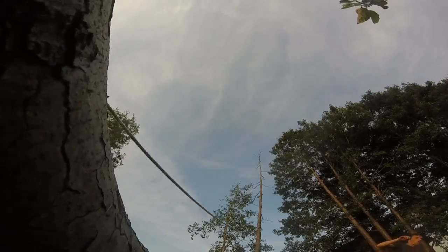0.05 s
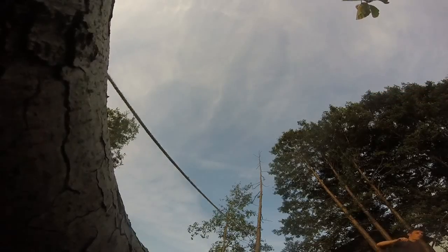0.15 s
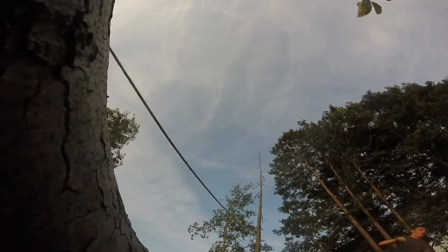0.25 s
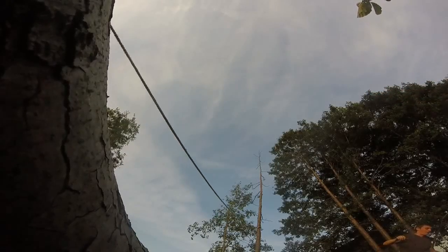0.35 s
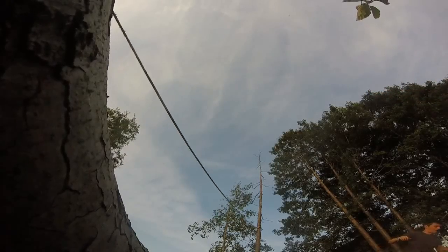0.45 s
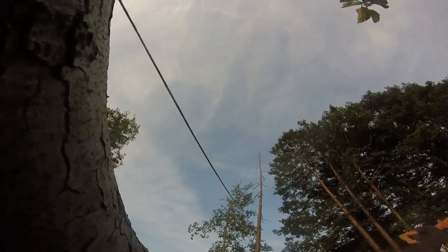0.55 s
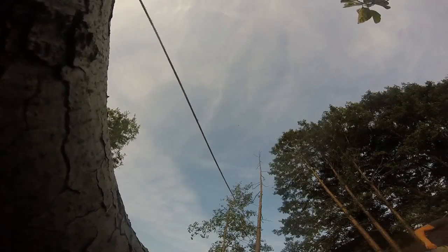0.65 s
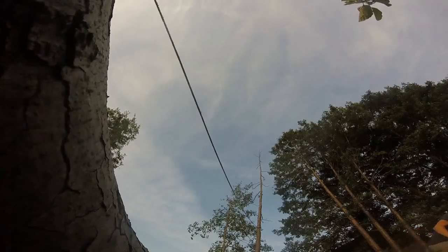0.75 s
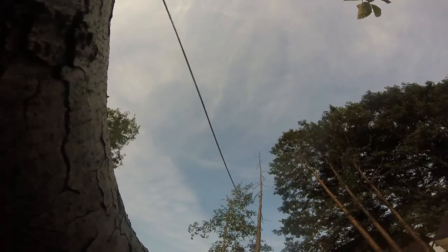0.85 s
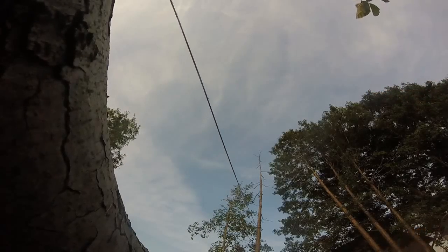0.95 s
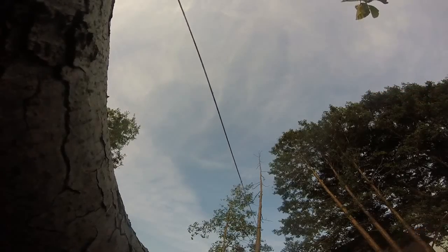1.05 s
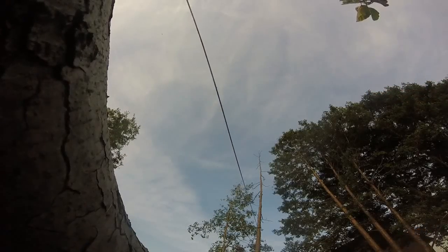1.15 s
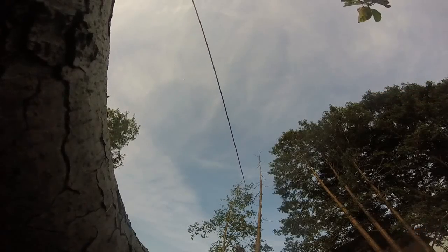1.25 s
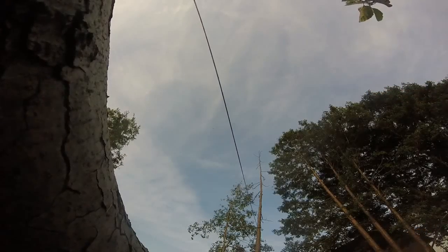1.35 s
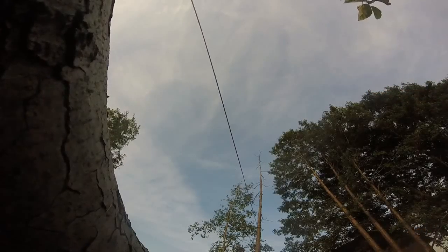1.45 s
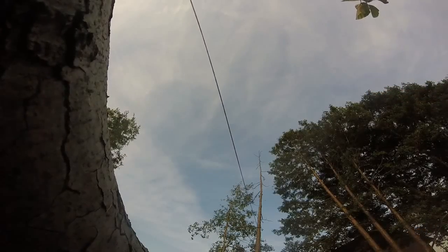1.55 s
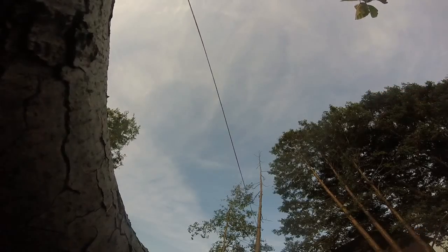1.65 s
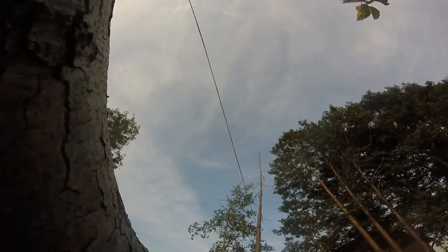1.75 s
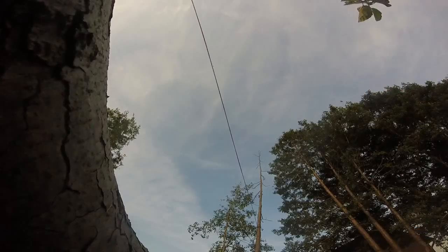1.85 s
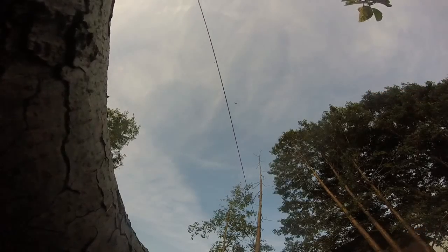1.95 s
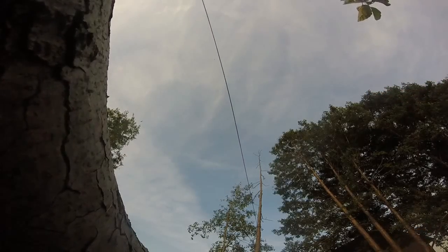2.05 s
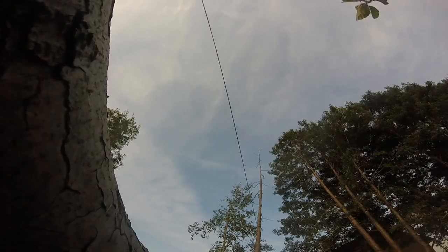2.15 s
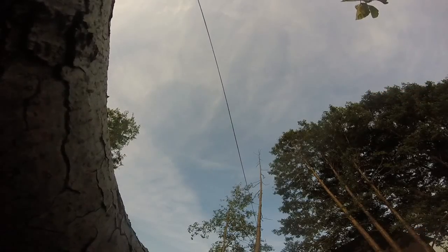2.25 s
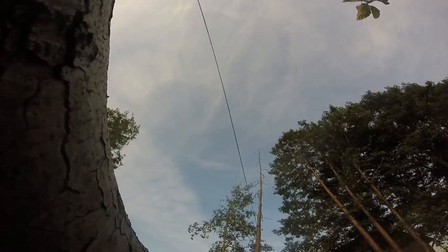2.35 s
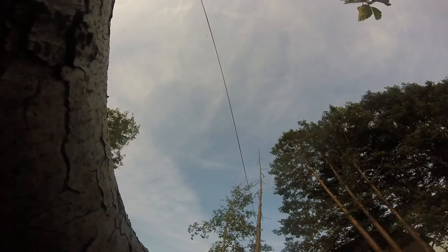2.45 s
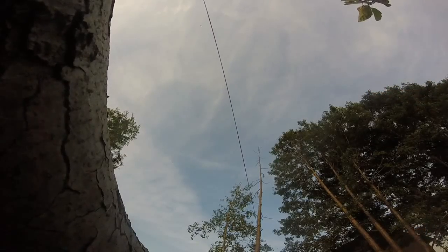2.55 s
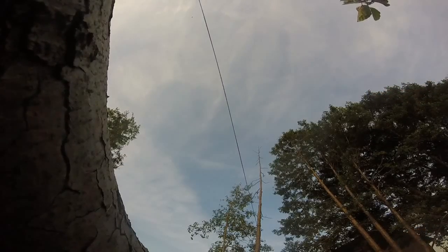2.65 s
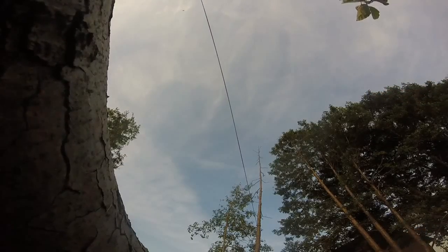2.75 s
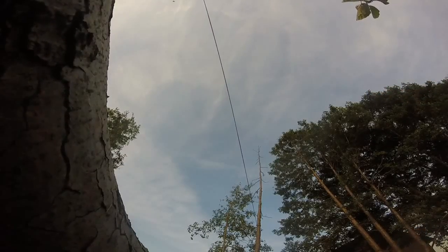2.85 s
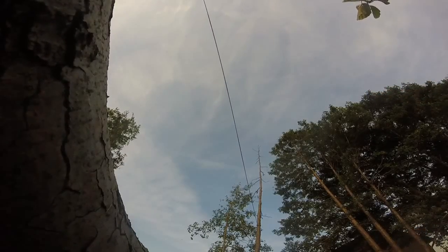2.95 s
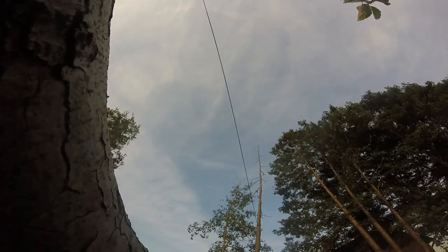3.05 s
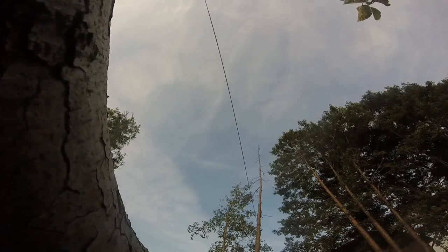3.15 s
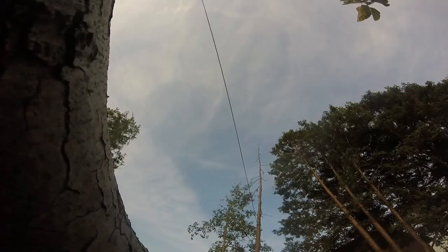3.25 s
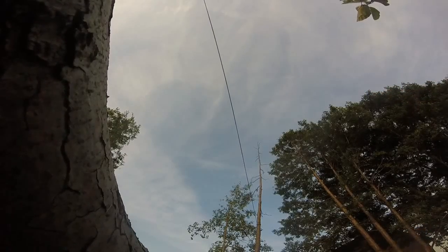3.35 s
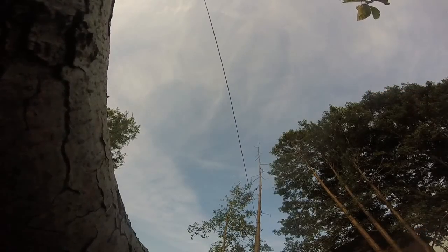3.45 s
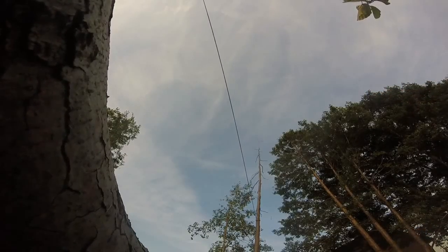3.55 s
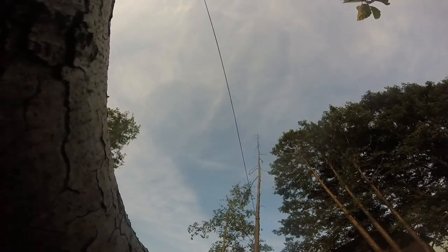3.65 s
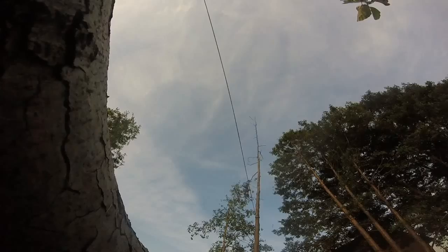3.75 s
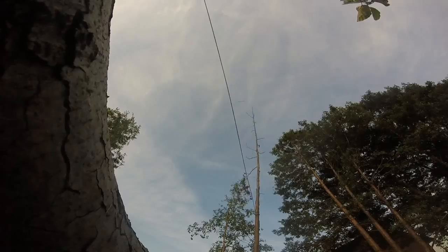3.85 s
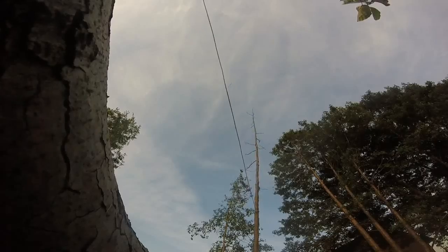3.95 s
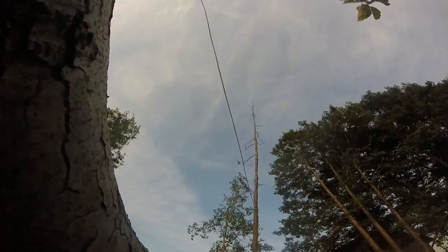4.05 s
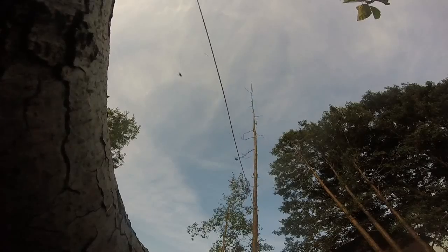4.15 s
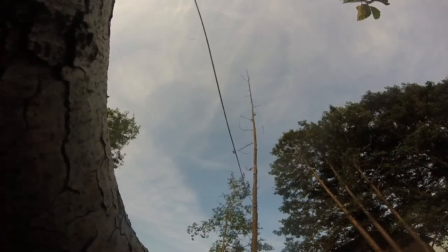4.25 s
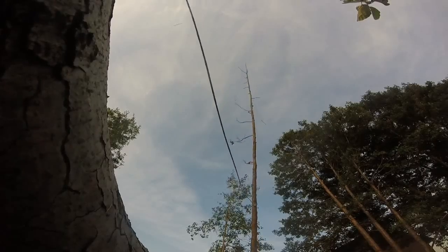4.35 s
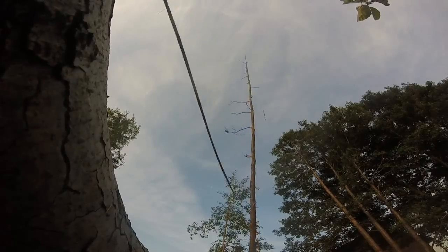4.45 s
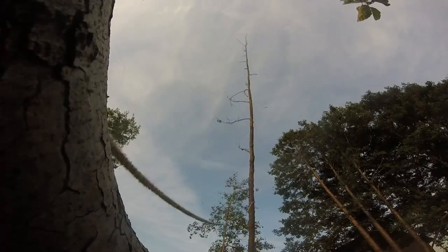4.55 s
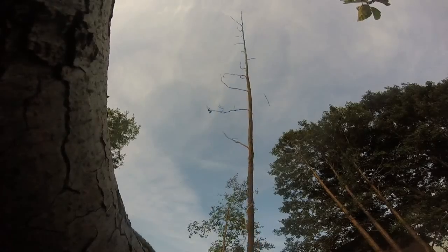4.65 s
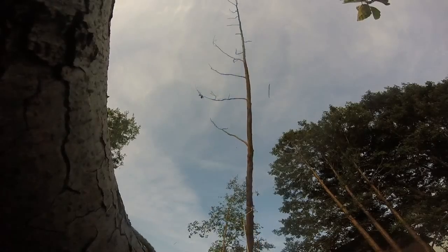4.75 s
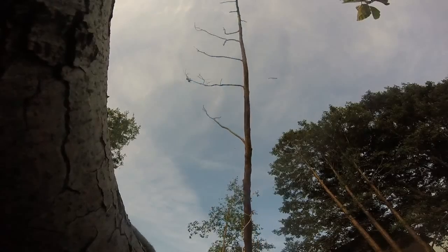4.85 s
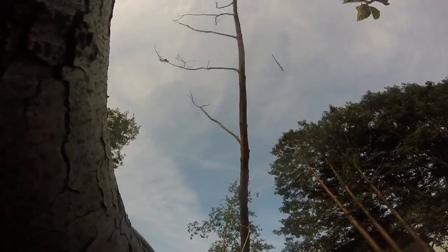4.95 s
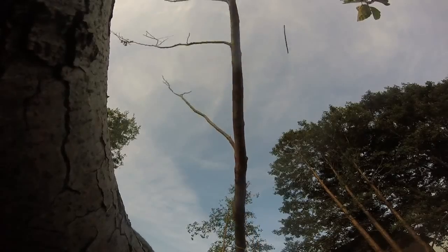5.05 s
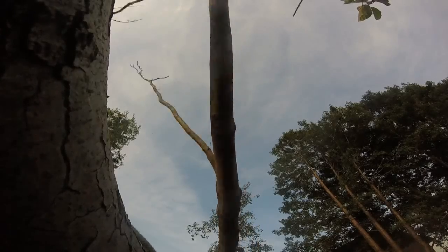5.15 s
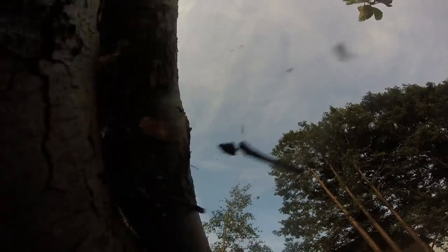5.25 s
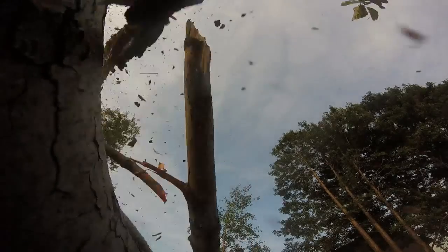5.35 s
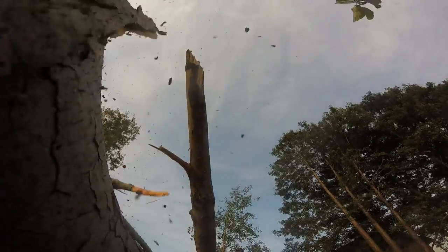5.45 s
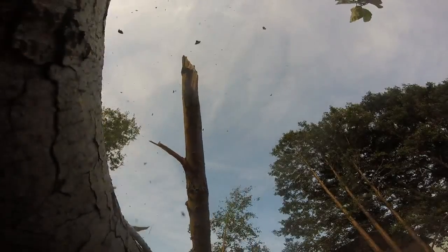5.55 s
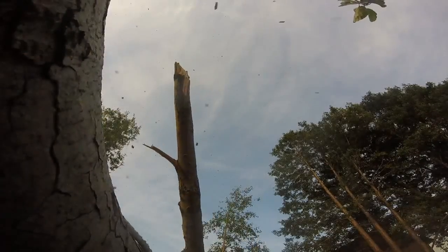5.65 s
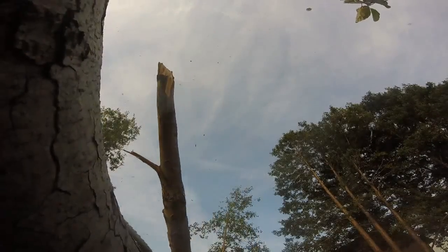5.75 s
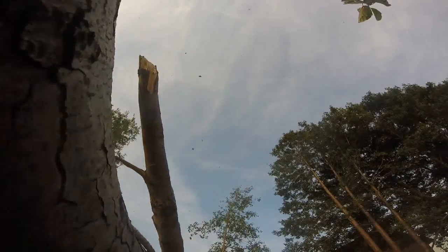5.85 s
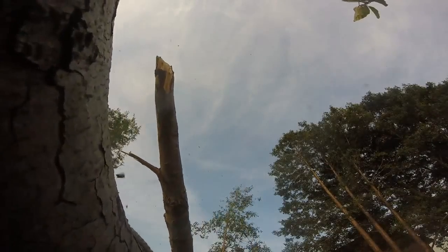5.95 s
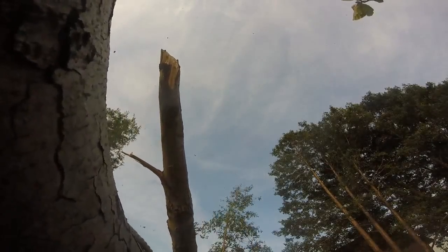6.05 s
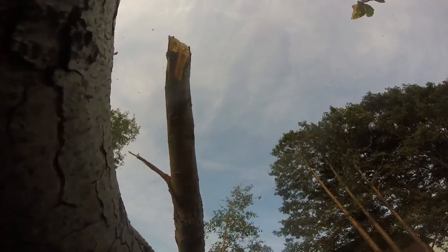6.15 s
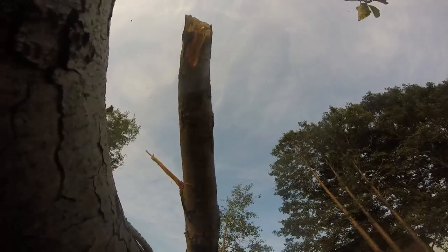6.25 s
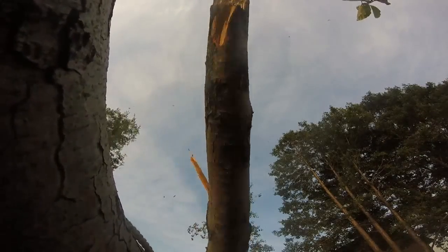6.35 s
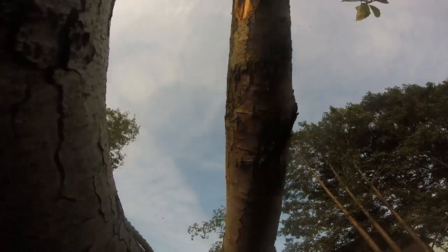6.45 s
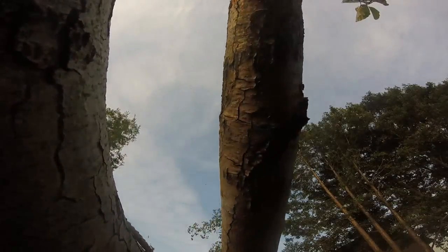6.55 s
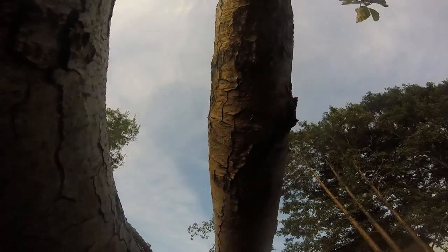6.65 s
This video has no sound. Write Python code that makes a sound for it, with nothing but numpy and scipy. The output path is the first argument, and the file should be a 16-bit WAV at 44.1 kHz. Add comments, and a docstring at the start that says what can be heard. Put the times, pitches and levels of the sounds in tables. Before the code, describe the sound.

A quiet wood, with soft, bass-weighted air noise. Two thin, distant bird whistles glide downward at about 1.0 and 1.3 s, with small twig ticks around 1.2, 1.6 and 2.3 s. A faint ground rumble stirs near 3 s. At 3.45-3.5 s the dead trunk cracks sharply at its foot, a hollow mid-pitched woody snap with a low thump, splinter spray and forest echo. Weaker creaking cracks continue to 4.2 s, with two more at 4.6 s; a very faint whistle comes at 4.8 s. Dry branches crackle at 5.0 s. At 5.29 s the trunk smashes down beside the microphone: deep thud, overloaded splintering crack, crushing wood and a second break at 5.35 s. Chips clatter until 5.65 s. The broken log thuds at 5.77 and 6.0 s, then in small quick knocks to 6.2 s, over fading rumble, trickling bark and last faint snaps at 6.3 and 6.5 s.

```python
"""Dead tree pulled down in a wood.

Bird: three far, gliding sine whistles. Trunk: cracks at its foot as a rope pulls it over, creaks, then
smashes down near the microphone and breaks; each crack is a snap plus fibre clicks through a wood filter.
Debris: random clicks of bark, twigs and chips. Ground: shaped noise rumble and sagging sine thuds as the
broken log bounces to rest. Air noise and forest echoes lie behind; the recorder's gain control ducks and recovers.
"""
import sys
import numpy as np
from scipy import signal
from scipy.fft import rfft, irfft
from scipy.io import wavfile
from scipy.ndimage import uniform_filter1d, minimum_filter1d

SR = 44100
rng = np.random.default_rng(int(sys.argv[2]) if len(sys.argv) > 2 else 0)


def generate_wav(sig):
    """Save sig (samples, or channels by samples) to the path in sys.argv[1] as 16-bit PCM at SR."""
    pcm = np.round(np.clip(np.atleast_2d(sig).T, -1, 1) * 32767).astype(np.int16)
    wavfile.write(sys.argv[1], SR, pcm)


N = 295848
TIME = np.arange(N) / SR


def from_db(db):
    """Decibels to amplitude gain."""
    return 10 ** (np.asarray(db) / 20)


def rms_one(x):
    """Scale to unit power."""
    return x / np.sqrt(np.mean(x ** 2) + 1e-20)


def at_hz(points, hz):
    """Interpolate a table on a log-frequency axis."""
    table_hz, value = np.transpose(points)
    return np.interp(np.log(hz + 1e-3), np.log(table_hz), value)


def band(x, low_hz, high_hz):
    """Causal band-pass."""
    sos = signal.butter(3, [low_hz, high_hz], "band", fs=SR, output="sos")
    return signal.sosfilt(sos, x + 1e-18)


def colour(x, spectrum, size=8192):
    """Minimum-phase filter from a spectrum table: the body rings only after it is struck."""
    gain = from_db(at_hz(spectrum, np.fft.rfftfreq(size, 1 / SR)))
    cepstrum = irfft(np.log(gain))
    # fold the cepstrum to its causal half
    cepstrum[1:size // 2] *= 2
    cepstrum[size // 2 + 1:] = 0
    impulse_response = irfft(np.exp(rfft(cepstrum)))
    return signal.fftconvolve(x, impulse_response)[:len(x)]


def add(track, s, sound):
    """Mix a sound in at s seconds."""
    start = round(s * SR)
    track[start:start + len(sound)] += sound[:N - start]


def grains(count, per_s, spread_db):
    """Random clicks of uneven size and either sign over count samples."""
    sizes = from_db(spread_db * np.minimum(rng.exponential(1, count), 4))
    signs = rng.choice([-1, 1], count)
    return sizes * signs * (rng.random(count) < per_s / SR)


def spell(row, attack_s, release_db_per_s):
    """Envelope that rises, sags while it lasts, then dies away."""
    s, length_s, level_db, sag_db_per_s = row
    t = np.maximum(TIME - s, 0)
    release_db = release_db_per_s * np.maximum(t - length_s, 0)
    return np.minimum(t / attack_s, 1) * from_db(level_db - sag_db_per_s * t - release_db)


# Edges in Hz of the knock, wood and splinter bands.
BAND_EDGES_HZ = [150, 1100, 3600, 17000]


def cracks(table, body, fibres_per_s, spread_db, snap_db, rise_s, variety_db=2.5, thin_db=9.0, size=6000):
    """Each crack is one snap and a short avalanche of fibre breaks ringing through its own piece of wood."""
    out, t = np.zeros(N), TIME[:size]
    hz = np.geomspace(200, 16000, 44)
    octaves_into_splinters = np.clip(np.log2(hz / BAND_EDGES_HZ[2]), 0, 1)
    for s, *levels_db, t60_s in table:
        envelope = (1 - np.exp(-t / rise_s)) * from_db(-60 * t / t60_s)
        fibres = rms_one(grains(size, fibres_per_s, spread_db)) * envelope
        fibres[0] += from_db(snap_db)

        # where splinters outweigh the wood's ring the piece is thin and its treble rises
        knock_db, wood_db, splinter_db = levels_db
        treble_db = np.clip(splinter_db - wood_db, 0, thin_db) * octaves_into_splinters
        piece_variety_db = variety_db * rng.standard_normal(len(hz))
        piece = np.c_[hz, at_hz(body, hz) + treble_db + piece_variety_db]
        burst = colour(fibres, piece)

        for level_db, low_hz, high_hz in zip(levels_db, BAND_EDGES_HZ, BAND_EDGES_HZ[1:]):
            part = band(burst, low_hz, high_hz)
            loudest_rms = np.sqrt(uniform_filter1d(part ** 2, size=176).max())  # over 4 ms
            add(out, s, from_db(level_db) * part / loudest_rms)
    return out


def light_cracks(table):
    """Widen rows for chips and twigs, which click with hardly any knock."""
    knock_db = -25.5  # against the wood's ring
    return [(s, wood_db + knock_db, wood_db, splinter_db, t60_s) for s, wood_db, splinter_db, t60_s in table]


# Air noise spectrum. Each row: frequency in Hz, relative level in dB.
AIR_SPECTRUM = [(12, -37.5), (20, -9), (59, -0.5), (103, 0), (137, -6), (175, -6), (1580, -19.5),
                (2330, -20.5), (2610, -22.5), (3260, -23.5), (13900, -40.5), (15500, -50)]
AIR_DB = -56.5


def air():
    """Steady noise, strongest in the bass."""
    return from_db(AIR_DB) * rms_one(colour(rng.standard_normal(N), AIR_SPECTRUM))


# Scatter from the surrounding trees. Each row: frequency in Hz, t60 in s.
FOREST_DECAY = [(200, 1), (1500, 0.46), (14000, 0.62)]


def forest(x, build_s):
    """Many faint echoes from trunks and leaves, each band dying at its own rate."""
    t, edges_hz = TIME[:SR], np.geomspace(120, 16000, 8)
    echoes = grains(SR, 4000, 0.62) * (1 - np.exp(-t / build_s))
    tail = np.zeros(SR)
    for low_hz, high_hz in zip(edges_hz, edges_hz[1:]):
        t60_s = at_hz(FOREST_DECAY, np.sqrt(low_hz * high_hz))
        tail += band(echoes, low_hz, high_hz) * from_db(-60 * t / t60_s)
    return signal.fftconvolve(x, tail / np.sqrt(np.sum(tail ** 2)))[:N]


# Whistles that glide down and may turn up again. Each row: start in seconds, length in s,
# first pitch in Hz, fall in Hz per s, turn after s, level in dB towards the end before flutter and fade.
BIRD_WHISTLES = [(1.044, 0.196, 2810, 1365, 0.16, -61), (1.335, 0.2, 2945, 3850, 0.122, -64),
                 (4.811, 0.11, 2755, 696, 0.11, -66)]
BIRD_RISE_HZ_PER_S, BIRD_SWELL_DB, BIRD_FADE_S = 4140, 9, 0.021


def bird(waver, flutter_db, overtone_db):
    """Thin gliding whistles that swell and flutter in pitch and strength."""
    out = np.zeros(N)
    flutter = rms_one(band(rng.standard_normal(N), 9, 100))
    for s, length_s, first_hz, fall_hz_per_s, turn_s, level_db in BIRD_WHISTLES:
        t = TIME[:round(length_s * SR)]
        wobble = flutter[round(s * SR):][:len(t)]
        fall_hz = fall_hz_per_s * np.minimum(t, turn_s)
        rise_hz = BIRD_RISE_HZ_PER_S * np.maximum(t - turn_s, 0)
        hz = (first_hz - fall_hz + rise_hz) * (1 + waver * wobble)
        phase = 2 * np.pi * np.cumsum(hz) / SR

        fade = np.minimum(np.minimum(t, t[::-1]) / BIRD_FADE_S, 1)
        swell_db = BIRD_SWELL_DB * (t / length_s - 1)
        envelope = np.sqrt(2) * fade * from_db(level_db + swell_db + flutter_db * wobble)
        add(out, s, envelope * (np.sin(phase) + from_db(overtone_db) * np.sin(2 * phase)))
    return out


# Ground shaking as the roots strain, the tree leans, crashes and rolls.
# Each row: start in seconds, length in s, level in dB, sag in dB per s.
RUMBLE_SPELLS = [(2.986, 0.095, -50.5, 2), (3.27, 0.35, -53.5, 8), (3.548, 1.4, -51.5, 1.5),
                 (5.294, 0.088, -16.5, 28.5), (5.54, 0.13, -39, 2), (5.784, 1.4, -35, 23.5)]
# Ground spectrum. Each row: frequency in Hz, relative level in dB.
GROUND_SPECTRUM = [(15, -17.5), (30, -2.5), (45, 6), (65, -1.5), (110, 1.5), (170, -16.5), (400, -30),
                   (2000, -71.5)]
RUMBLE_ATTACK_S, RUMBLE_RELEASE_DB_PER_S, RUMBLE_FLOOR_DB = 0.079, 177, -65


def rumble():
    """Low shaking of the ground over a faint steady rumble."""
    spells = sum(spell(row, RUMBLE_ATTACK_S, RUMBLE_RELEASE_DB_PER_S) for row in RUMBLE_SPELLS)
    level = from_db(RUMBLE_FLOOR_DB) + spells
    return level * rms_one(colour(rng.standard_normal(N), GROUND_SPECTRUM))


# Small twig ticks, and one late chip at 6.16 s. Each row: start in seconds, wood level in dB, splinter level in
# dB, t60 in s.
TWIG_TICKS = [(1.226, -54, -66, 0.023), (1.578, -56, -63, 0.032), (2.28, -53.5, -54.5, 0.16),
              (3.852, -66, -54, 0.025), (3.923, -63, -56.5, 0.026), (4.298, -74, -54.5, 0.022),
              (5.088, -58, -46.5, 0.12), (6.159, -45, -49, 0.022)]
# Dry branch wood spectrum. Each row: frequency in Hz, relative level in dB.
BRANCH_SPECTRUM = [(220, -6.5), (500, -6.5), (1000, -14.5), (1500, 8), (1900, -2), (2400, 7), (3150, -7),
                   (3600, -17), (5000, -21.5), (6300, -19), (8500, -23.5), (10500, -39), (15000, -50)]


def twig_ticks():
    """Twigs and a late chip tick: a strong snap over weak fibre breaks."""
    return cracks(light_cracks(TWIG_TICKS), BRANCH_SPECTRUM,
                  fibres_per_s=8500, spread_db=4.0, snap_db=39, rise_s=0.0022)


# Showers of splinters and bark. Each row: start in seconds, length in s, level in dB, sag in dB per s.
DEBRIS_SHOWERS = [(3.491, 0.18, -43, 146), (3.793, 0.33, -62, 23), (5.294, 0.19, -19, 47.5),
                  (5.55, 0.035, -53, 55.5), (5.61, 0.098, -42.5, 55), (5.84, 0.044, -48.5, 28),
                  (5.972, 0.026, -53, 50), (6.151, 0.058, -50.5, 26)]
# Last crumbs trickling down. One row: start in seconds, length in s, level in dB, sag in dB per s.
SETTLING = (6, 2, -63.5, 10)
# Bark spectrum. Each row: frequency in Hz, relative level in dB.
BARK_SPECTRUM = [(150, 2), (400, -0.5), (900, -5.5), (1500, 3), (2500, 1), (3800, -15.5), (6500, -16),
                 (9000, -17.5), (14000, -37)]
SHOWER_ATTACK_S, SHOWER_RELEASE_DB_PER_S = 0.012, 252


def debris(per_s, spread_db, clump_db, twigs_per_s, twigs_db):
    """Crumbs of bark patter down in clumps; among them single twigs click in bands of differing pitch."""
    clumps = rms_one(band(rng.standard_normal(N), 34, 77))
    clumped_grains = grains(N, per_s, spread_db) * from_db(clump_db * clumps)
    crumbs = rms_one(colour(clumped_grains, BARK_SPECTRUM))

    twigs, pitches_hz = np.zeros(N), np.geomspace(1600, 12000, 16)
    for hz in pitches_hz:
        clicks = grains(N, twigs_per_s / len(pitches_hz), spread_db / 2)
        twigs += from_db(at_hz(BARK_SPECTRUM, hz)) * band(clicks, hz * .87, hz * 1.13)

    rows = DEBRIS_SHOWERS + [SETTLING]
    level = sum(spell(row, SHOWER_ATTACK_S, SHOWER_RELEASE_DB_PER_S) for row in rows)
    return level * (crumbs + from_db(twigs_db) * rms_one(twigs))


# Chips landing by the microphone. Each row: start in seconds, wood level in dB, splinter level in dB, t60 in s.
CHIP_LANDINGS = [(5.3925, -6.5, -13.5, 0.029), (5.445, -17, -33, 0.041), (5.523, -27, -22.5, 0.0082),
                 (5.542, -24.5, -25.5, 0.0076), (5.6005, -22, -16.5, 0.014), (5.638, -11, -30, 0.019),
                 (5.771, -34, -46, 0.011), (5.812, -42, -46.5, 0.014), (5.899, -46, -55, 0.029)]
# Chip spectrum. Each row: frequency in Hz, relative level in dB.
CHIP_SPECTRUM = [(500, -12.5), (1000, -16.5), (1600, -2.5), (2500, 3), (3800, -8.5), (6000, -17),
                 (8500, -9), (11000, -23), (15000, -28)]


def chip_landings():
    """Flying chips land: light pieces with little bass."""
    return cracks(light_cracks(CHIP_LANDINGS), CHIP_SPECTRUM,
                  fibres_per_s=5000, spread_db=5.5, snap_db=-3, rise_s=0.00057, thin_db=13.0)


# Dry branches breaking. Each row: start in seconds, wood level in dB.
BRANCH_SNAPS = [(4.985, -32.5), (5.01, -46), (5.027, -33.5), (5.057, -38), (6.313, -41), (6.488, -46)]
BRANCH_KNOCK_DB, BRANCH_SPLINTER_DB, BRANCH_T60_S = -14, -16.5, 0.058  # levels against the wood's ring


def branch_snaps():
    """Dry branches snap with one balance and decay, mostly in the middle band."""
    rows = [(s, db + BRANCH_KNOCK_DB, db, db + BRANCH_SPLINTER_DB, BRANCH_T60_S) for s, db in BRANCH_SNAPS]
    return cracks(rows, BRANCH_SPECTRUM, fibres_per_s=1800, spread_db=4.0, snap_db=-6, rise_s=0.001)


# The broken log bouncing to rest.
# Each row: start in seconds, thud peak in dB, settled pitch in Hz, bark scuff wood level in dB.
LOG_BOUNCES = [(5.773, -17.5, 106, -31), (6.003, -17.5, 122.7, -45), (6.124, -30.5, 95.6, -42.5),
               (6.174, -33.5, 96, -45.5), (6.211, -33.5, 95, -48)]
SCUFF_KNOCK_DB, SCUFF_T60_S = -44, 0.074
SCUFF_SPLINTER_DB = -11.5  # against the wood's ring


def scuffs():
    """Bark grinds on the ground as the log's weight comes down; the knock is level on every bounce."""
    rows = [(s, SCUFF_KNOCK_DB, db, db + SCUFF_SPLINTER_DB, SCUFF_T60_S) for s, _, _, db in LOG_BOUNCES]
    return cracks(rows, BRANCH_SPECTRUM, fibres_per_s=4000, spread_db=4.0, snap_db=-10, rise_s=0.0097)


# The heavy trunk shaking the ground. Each row: start in seconds, peak in dB, settled pitch in Hz, swell in s.
TRUNK_THUDS = [(3.495, -23.5, 36.6, 0.033), (3.502, -27, 101.6, 0.013), (3.609, -34, 47.9, 0.12),
               (4.799, -40, 117.4, 0.018), (4.862, -38.5, 107.7, 0.027), (5.288, 1, 127.6, 0.016),
               (5.297, 8, 80, 0.01)]
BOUNCE_SWELL_S = 0.015


def thuds(stiffening, relax_s):
    """Soft, heavy contacts of trunk and log swell and die; their pitch sags as the load eases."""
    out, t = np.zeros(N), TIME[:SR]
    bounces = [(s, peak_db, hz, BOUNCE_SWELL_S) for s, peak_db, hz, _ in LOG_BOUNCES]
    for s, peak_db, settled_hz, swell_s in TRUNK_THUDS + bounces:
        hz = settled_hz * (1 + stiffening * np.exp(-t / relax_s))
        phase = 2 * np.pi * np.cumsum(hz) / SR
        envelope = (t / swell_s * np.exp(1 - t / swell_s)) ** 2
        add(out, s, from_db(peak_db) * envelope * np.sin(phase))
    return out


# Main mode of the dry trunk, set ringing by two fractures.
# Each row: start in seconds, peak in dB, frequency in Hz, t60 in s.
TRUNK_RINGS = [(3.483, -19, 1538, 0.027), (3.734, -43, 1533, 0.19)]


def trunk_ring(rise_s, size=9000):
    """The mode builds up while the fibres tear, then dies."""
    out, t = np.zeros(N), TIME[:size]
    for s, peak_db, hz, t60_s in TRUNK_RINGS:
        envelope = (1 - np.exp(-t / rise_s)) * from_db(-60 * t / t60_s)
        add(out, s, from_db(peak_db) * envelope / envelope.max() * np.sin(2 * np.pi * hz * t))
    return out


# Fibres breaking at the foot. Each row: start in seconds, wood level in dB before the distance loss,
# tilt to the treble in dB, t60 in s.
TRUNK_CRACKS = [(3.448, -42, 6, 0.074), (3.483, -19, 2.5, 0.027), (3.49, -28, 0.5, 0.055),
                (3.521, -38, 9.5, 0.029), (3.668, -44.5, -0.5, 0.084), (3.737, -47.5, -12, 0.1),
                (3.758, -45, -2, 0.11), (3.815, -50, -10.5, 0.075), (3.921, -51, 0, 0.097),
                (4.148, -45.5, -1, 0.1), (4.227, -51.5, -6.5, 0.11), (4.599, -40.5, 2, 0.062),
                (4.635, -43, 7, 0.018)]
# Trunk wood spectrum. Each row: frequency in Hz, relative level in dB.
TRUNK_SPECTRUM = [(250, -15.5), (450, -12.5), (700, -8), (1100, -5), (1500, 5), (1950, -10), (2500, 4),
                  (3300, -16.5), (4800, -22.5), (6200, -18), (7900, -26.5), (10000, -32.5), (15000, -58)]
TRUNK_KNOCK_DB, TRUNK_SPLINTER_DB = -3.5, -9.5  # against the wood's ring, before tilt
TRUNK_DISTANCE_DB = -2


def foot_cracks():
    """Fibres tear at the far foot; thin ones give more splinter and less knock than thick ones."""
    rows = []
    for s, wood_db, tilt_db, t60_s in TRUNK_CRACKS:
        knock_db = wood_db + TRUNK_KNOCK_DB - tilt_db
        splinter_db = wood_db + TRUNK_SPLINTER_DB + tilt_db
        rows.append((s, knock_db, wood_db, splinter_db, t60_s))
    return from_db(TRUNK_DISTANCE_DB) * cracks(rows, TRUNK_SPECTRUM, fibres_per_s=5000, spread_db=5.0,
                                               snap_db=4, rise_s=0.0015)


# The trunk hitting and breaking, in two pairs.
# Each row: start in seconds, knock level in dB, wood level in dB, splinter level in dB, t60 in s.
BREAKS = [(5.2893, 10, -3, 0.5, 0.0052), (5.2937, -4.5, 16, 8, 0.014), (5.353, -7, 12.5, 10.5, 0.016),
          (5.3563, -6, 11, 9, 0.0067)]
# First crushing crack. One row: knock level in dB, wood level in dB, splinter level in dB.
CRUSH_DB = (5.5, -2.5, -11.5)
# Loss with each further crack. One row: knock in dB, wood in dB, splinter in dB (negative gains).
CRUSH_LOSS_DB = (3.5, -0.4, -0.4)
CRUSH_START_S, CRUSH_GAP_S, CRUSH_T60_S = 5.3, 0.0095, 0.045  # start and gap before jitter


def crash(count):
    """The trunk breaks twice; between the breaks its wood is crushed in a run of cracks losing knock."""
    jitter = rng.uniform(-.2, .2, count)
    starts_s = CRUSH_START_S + CRUSH_GAP_S * (np.arange(count) + jitter)
    crushing = []
    for k, s in enumerate(starts_s):
        levels_db = np.subtract(CRUSH_DB, np.multiply(k, CRUSH_LOSS_DB))
        crushing.append((s, *levels_db, CRUSH_T60_S))
    return cracks(BREAKS + crushing, BRANCH_SPECTRUM, fibres_per_s=4000, spread_db=4.5,
                  snap_db=4.5, rise_s=0.00039)


def scene():
    """The far foot of the tree and the bird are wet with echoes, the near crash almost dry."""
    whistle = bird(waver=0.0094, flutter_db=5.5, overtone_db=-19)
    shower = debris(per_s=2200, spread_db=3.0, clump_db=3.0, twigs_per_s=300, twigs_db=-3.5)
    ground = rumble() + thuds(stiffening=0.58, relax_s=0.0048)
    light_pieces = twig_ticks() + chip_landings()
    far = foot_cracks()
    near = branch_snaps() + scuffs() + crash(count=5)
    echoes = forest(from_db(-11.0) * (far + whistle) + from_db(-34) * near, build_s=0.0052)
    background = air() + echoes + whistle + ground
    return (background + light_pieces + shower + trunk_ring(rise_s=0.0033) + far + near)[None]


def gain_control(x, threshold_db, release_db_per_s):
    """Ducks just ahead of a loud peak and comes back slowly."""
    level_db = 10 * np.log10(np.maximum(uniform_filter1d(x ** 2, size=220), 1e-12))  # over 5 ms
    excess_db = np.maximum(level_db - threshold_db, 0)
    released_db = release_db_per_s * TIME
    held_db = np.maximum.accumulate(excess_db + released_db) - released_db
    gain_db = minimum_filter1d(-held_db, size=500)  # look-ahead
    return x * from_db(uniform_filter1d(gain_db, size=400))


CUTOFF_HZ = 15800


def record(dry):
    """Gain control, full-scale clipping and the top cut."""
    clipped = np.clip(gain_control(dry[0], threshold_db=-9.5, release_db_per_s=25.5), -1, 1)
    top_cut = signal.ellip(10, .1, 70, CUTOFF_HZ, fs=SR, output="sos")
    return signal.sosfilt(top_cut, clipped)[None]


dry = scene()
out = record(dry)
generate_wav(out)
```